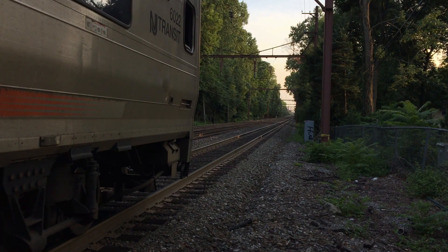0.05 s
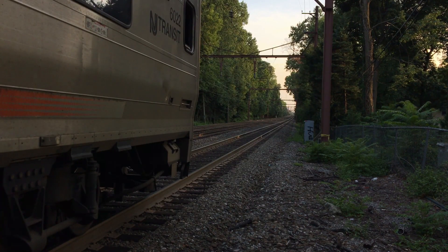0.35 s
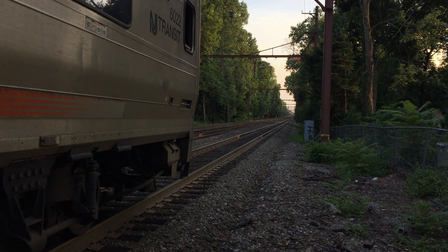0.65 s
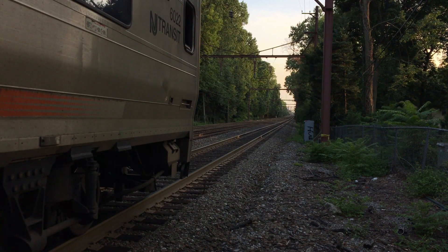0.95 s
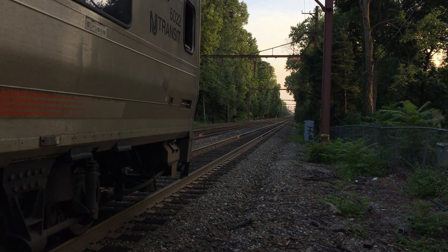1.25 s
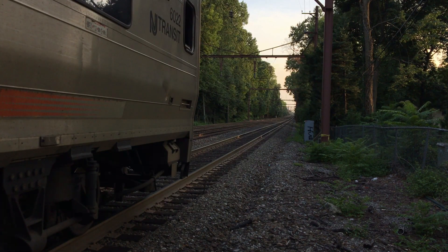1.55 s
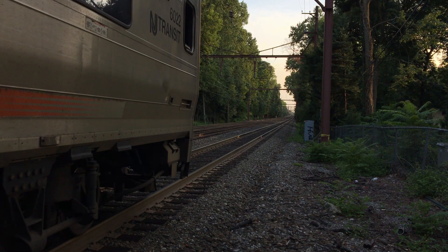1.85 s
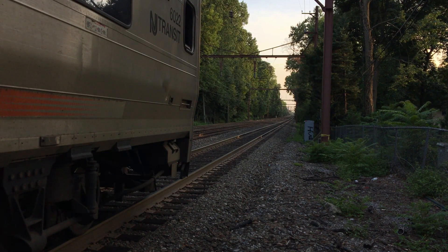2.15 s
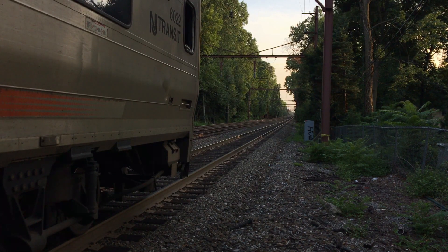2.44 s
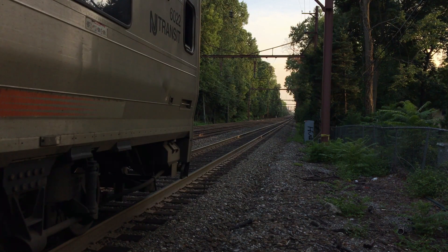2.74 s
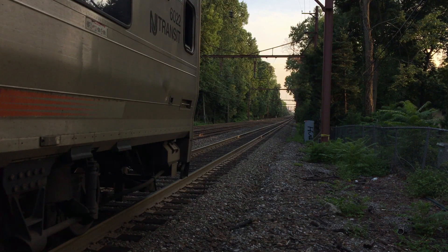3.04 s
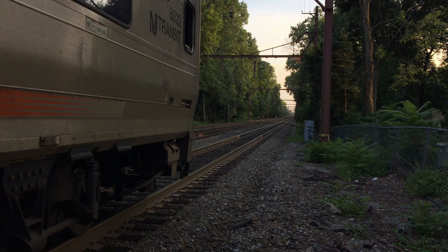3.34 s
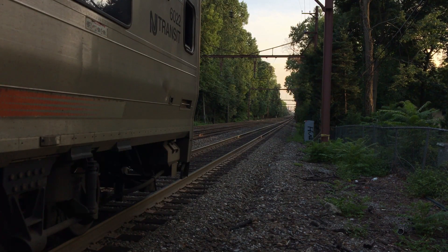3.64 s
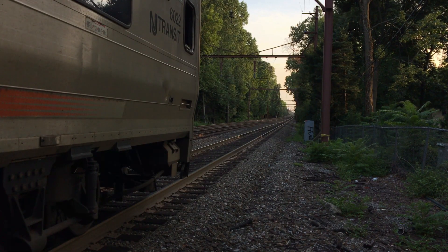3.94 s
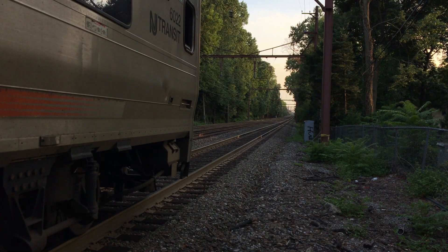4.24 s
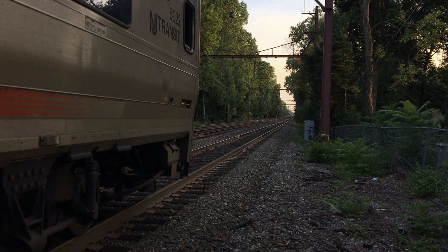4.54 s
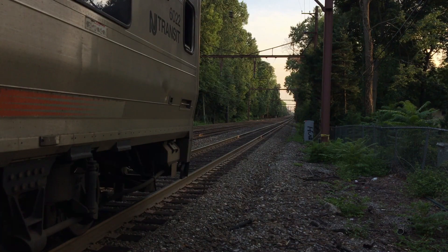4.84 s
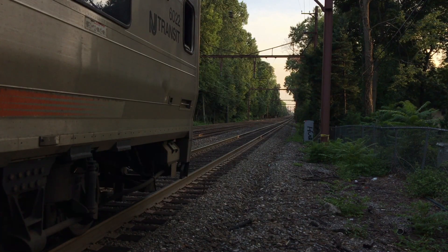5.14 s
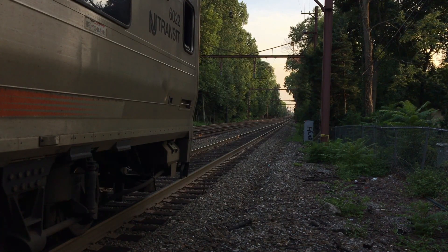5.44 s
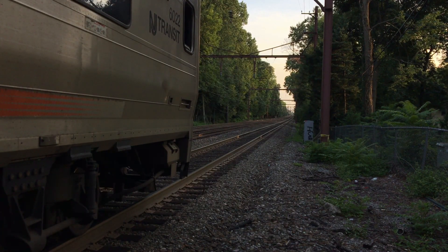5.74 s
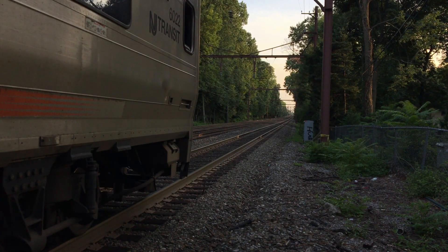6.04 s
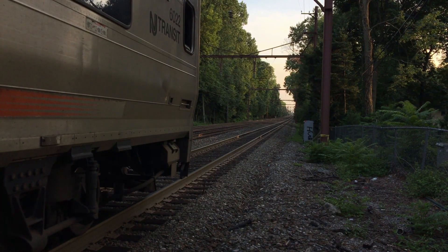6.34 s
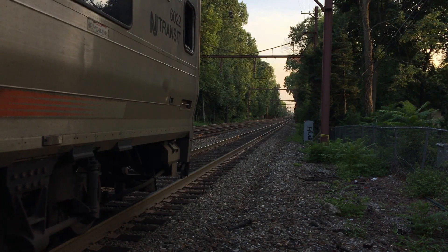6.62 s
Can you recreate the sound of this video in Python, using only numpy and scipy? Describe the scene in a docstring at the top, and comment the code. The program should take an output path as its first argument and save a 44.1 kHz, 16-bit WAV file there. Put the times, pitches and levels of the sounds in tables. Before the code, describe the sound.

Outdoors on a wooded railway line, the low fan noise and electrical hum of a waiting train sit under faint insects and a far bird. After about two seconds air hisses and an air-driven bell begins, close to the microphone. Six loud, slightly distorted strikes follow at a gently quickening pace, each with a harsh crack and a lingering ring, separated by metallic clacks and puffs of air.

```python
"""A wooded railway line in the evening: a standing train rumbles and hums, insects buzz, a far bird calls
four times and a far motor's note comes and goes. Compressed air hisses into the bell ringer, and its
piston drives the clapper against the bell six times, a little faster each time. The bell rings in
beating pairs of modes; between strikes the piston clacks back and the air valve snaps over.
The loud bell overloads the recorder and pulls its gain down."""
import sys
import numpy as np
from scipy import signal
from scipy.fft import rfft, irfft
from scipy.io import wavfile
from scipy.ndimage import uniform_filter1d, minimum_filter1d

SR = 44100
rng = np.random.default_rng(int(sys.argv[2]) if len(sys.argv) > 2 else 0)


def store_pcm(level_fs):
    """Save levels as 16-bit WAV."""
    pcm = np.round(np.clip(level_fs, -1, 1) * 32767).astype(np.int16)
    wavfile.write(sys.argv[1], SR, np.atleast_2d(pcm).T)


N = 303408
TIME = np.arange(N) / SR

# clapper strikes: t/s, force/dB, trim of the bell's hum/dB, share of the hum's twin/0-1
STRIKES = [(2.88, -0.5, -0.5, 0.32), (3.7403, .5, -1, 0.46), (4.5746, 0, -2, 0.29),
           (5.3300, -0.75, 2, 0.11), (6.0670, -1, 1, 0.1), (6.7987, -1, -0.5, 0.2)]
# colour of the air valve's snaps and puffs: f/Hz, relative level/dB
VALVE_COLOUR = [(900, -10), (1800, -11), (3100, -19), (3800, -6), (6000, -8.5), (7600, -6), (8600, -2.5),
                (9750, 0), (10300, -16), (11700, -5), (13500, -21), (15500, -15)]
# colour of the supply pipe's hiss: f/Hz, relative level/dB
PIPE_COLOUR = [(800, -4), (2300, 1), (3100, -1.5), (3500, 0.5), (3900, -2), (4500, -1.5), (5200, -8),
               (9000, -5.5), (12000, -14), (15600, -22)]


def from_db(db):
    """Decibels to gain."""
    return 10 ** (np.asarray(db) / 20)


def unit_rms(x):
    """Scale to an rms of 1."""
    return x / np.sqrt(np.mean(x ** 2) + 1e-20)


def noise(colour):
    """Unit-rms noise of a given colour, rolled off below its first point."""
    hz, db = np.transpose(colour)
    f = np.maximum(np.fft.rfftfreq(N, 1 / SR), 1)
    gain = from_db(np.interp(np.log(f), np.log(hz), db)) * np.minimum(f / hz[0], 1) ** 2
    return unit_rms(irfft(rfft(rng.standard_normal(N)) * gain, N))


def drift(rate_hz):
    """Smooth random modulation at unit rms."""
    f = np.fft.rfftfreq(N, 1 / SR)
    return unit_rms(irfft(rfft(rng.standard_normal(N)) / (1 + (f / rate_hz) ** 2), N))


def burst(start, rise, t60):
    """A percussive envelope that rises from its start and dies away."""
    age = np.maximum(TIME - start, 0)
    return (1 - np.exp(-age / rise)) * from_db(-60 * np.minimum(age / t60, 3))


def hump(crest_s, width_s):
    """A smooth rise and fall of height 1."""
    return np.exp(-((TIME - crest_s) / width_s) ** 2)


def hiss_level(opens_s, db, settle_db_per_s=3):
    """Envelope of a hiss that opens abruptly and eases as the pressure settles."""
    age = np.maximum(TIME - opens_s, 0)
    return (1 - np.exp(-age / .004)) * from_db(db - settle_db_per_s * age)


def trackside(x, wet_db, t60, dull_hz):
    """Add scattered, dull echoes from the cars and trees."""
    t = TIME[:SR]
    tail = rng.standard_normal(SR) * from_db(-60 * t / t60) * (t > .006)
    tail = signal.sosfilt(signal.butter(1, dull_hz, fs=SR, output="sos"), tail)
    return x + from_db(wet_db) * signal.fftconvolve(x, tail / np.linalg.norm(tail))[:N]


def insects(level_db=-60, shimmer_db=1):
    """Many far insects blend into one high, shimmering band."""
    # colour of the chorus: f/Hz, relative level/dB
    chorus = [(3000, -28.5), (6200, -17), (6600, -7), (6950, 3.5), (7250, -0.5), (7550, -7), (8300, -7),
              (8600, -21), (10300, -31), (14500, -34), (16000, -50)]
    return from_db(level_db + shimmer_db * drift(25)) * noise(chorus)


def far_bird(sag=0.0308, scoop=0.059, rasp=0.0089, trim_db=0.5, flutter_db=2.5, darken_db=9):
    """Harsh calls that start abruptly, scoop up, flutter, sag and darken, and echo in the wood."""
    # calls: t/s, length/s, pitch/Hz, level/dB
    calls = [(.25, 0.18, 942, -59.5), (0.571, 0.13, 923, -59), (1.056, 0.176, 921, -58),
             (1.507, 0.18, 912, -58.5)]
    # the bird's voice: harmonic number, level/dB
    harmonics = [(3, -8.5), (4, -5), (5, -16.5), (6, -18), (10, -23), (12, -28)]
    out = np.zeros(N)
    for start, length, pitch, db in calls:
        along = np.clip((TIME - start) / length, 0, 1)
        on = (along > 0) & (along < 1)
        hz = pitch * (1 - sag * along ** 2 - scoop * np.exp(-along * 20) + rasp * drift(150))
        phase = 2 * np.pi * np.cumsum(hz) / SR
        shift_db = darken_db * (along[on] - .5)  # weight moves from the upper harmonics to the lowest
        voice = sum(from_db(level + (shift_db if i == 0 else -shift_db)) * np.sin(round(k) * phase[on])
                    for i, (k, level) in enumerate(harmonics))
        voice *= from_db(flutter_db * drift(40)[on])
        out[on] += from_db(db + trim_db) * np.sin(np.pi * along[on]) ** .25 * voice
    return trackside(out, wet_db=-8, t60=0.88, dull_hz=5000)


def far_motor(start_s=2.68, pitch_hz=251, sag_hz_per_s=5, level_db=-41.5, octave_db=-13):
    """A faint, sinking note with its octave swells, holds and fades."""
    attack_s, hold_s, release_s = 0.093, 0.99, 0.56
    age = np.maximum(TIME - start_s, 0)
    fading = np.maximum(age - attack_s - hold_s, 0)
    envelope = np.minimum(age / attack_s, 1) * np.exp(-fading / release_s)
    phase = 2 * np.pi * np.cumsum(pitch_hz - sag_hz_per_s * age) / SR + 0.56 * drift(12)
    return from_db(level_db) * envelope * (np.sin(phase) + from_db(octave_db) * np.sin(2 * phase))


def standing_train(fans_db=-43, deep_db=-51, eases_s=4.22, fall_db_per_s=2.5, hum_follows=0.62):
    """Fans and electrical hum hold, then die down over a deep rumble; the low end swells once."""
    # colour of the fans: f/Hz, relative level/dB
    fan_colour = [(105, -6), (197, 0), (284, -11), (357, -9), (429, -14.5), (728, -21.5), (1180, -27.5),
                  (1450, -26.5), (3310, -40.5), (3620, -40.5), (3970, -43), (6000, -66), (7800, -82),
                  (13200, -120)]
    # colour of the deep rumble: f/Hz, relative level/dB
    deep_colour = [(15, -40), (25, -11), (43, -2.5), (62, 2.5), (85, -2), (130, -8), (250, -41),
                   (2000, -120)]
    # tones of the electrical gear: f/Hz, starting rms level/dB
    gear_tones = [(59.3, -52.5), (119.6, -56.5), (199.2, -56.5), (360.7, -61), (592.2, -65), (710.6, -68)]
    fall_db = fall_db_per_s * np.maximum(TIME - eases_s, 0)
    swell = hump(crest_s=6.79, width_s=0.11)  # under the last strike
    fans = (from_db(fans_db - fall_db) + from_db(-42) * swell) * noise(fan_colour)
    deep = (from_db(deep_db) + from_db(-45) * swell) * noise(deep_colour)
    hum = sum(from_db(db) * np.sqrt(2) * np.sin(2 * np.pi * hz * TIME + 0.86 * drift(2.9))
              for hz, db in gear_tones)
    return fans + deep + from_db(-hum_follows * fall_db) * hum


def stray_puff(start_s=1.842, level_db=-53):
    """A small puff of air escapes under the train."""
    return from_db(level_db) * burst(start_s, rise=0.009, t60=0.23) * noise(PIPE_COLOUR)


def air_supply(surge_db=11.5, flutter_db=1.5):
    """Air hisses and surges through the empty pipe; a moment after it opens, the ringer starts to leak."""
    # colour of the ringer's leak: f/Hz, relative level/dB
    leak_colour = [(600, -23), (1200, 0.5), (2100, 8), (3100, -8.5), (5000, -3), (5700, 8), (6700, -4),
                   (8700, 7), (9500, 5), (10400, 2.5), (12100, 9), (13400, 4), (15600, 5)]
    surge = from_db(surge_db * hump(crest_s=2.615, width_s=0.12))
    pipe = hiss_level(opens_s=2.25, db=-51) * surge * noise(PIPE_COLOUR)
    flutter = from_db(flutter_db * drift(30))
    leak = hiss_level(opens_s=2.435, db=-41) * flutter * noise(leak_colour)
    return pipe + leak


def piston_rise(puff_db=-36.5, puff_lead_s=0.066, rush_db=-41, rush_lead_s=0.034):
    """Air drives the piston up: a low rush into every strike, and a puff for each after the first."""
    # body of the rush: f/Hz, relative level/dB
    rush_colour = [(150, -42), (300, -9), (410, 1), (560, -4), (780, -19), (1250, -4), (1600, -21),
                   (2000, -6.5), (3000, -17), (8000, -22.5)]
    puffs = sum(burst(s - puff_lead_s, rise=0.01, t60=0.29) for s, *_ in STRIKES[1:])
    rushes = sum(hump(s - rush_lead_s, width_s=0.1) for s, *_ in STRIKES)
    return from_db(puff_db) * puffs * noise(VALVE_COLOUR) + from_db(rush_db) * rushes * noise(rush_colour)


def air_valve(seat_s=0.0034, touch_db=-7, t60=0.039, tail_db=-12):
    """The valve snaps over: a light touch, then it seats and buzzes briefly."""
    # valve snaps: t/s, level/dB
    snaps = [(2.792, -33), (3.5247, -26), (4.414, -25.5), (5.1746, -26.5), (5.9194, -25.5), (6.657, -27)]
    envelope = np.zeros(N)
    for start, db in snaps:
        touch = from_db(touch_db) * burst(start, 0.00044, t60)
        seat = burst(start + seat_s, 0.00089, t60)
        tail = from_db(tail_db) * burst(start, rise=.004, t60=0.22)
        envelope += from_db(db) * (touch + seat + tail)
    return envelope * noise(VALVE_COLOUR)


def piston_stop(bounce_s=0.0047, bounce_db=-4, housing_db=-1, rattle_db=1):
    """The piston falls back on its stop, bounces, rattles and rings its housing."""
    # landings: t/s, force/dB, t60/s, tilt of the housing's ring/dB per octave
    clacks = [(2.438, -40, 0.057, -6), (2.4755, -35.5, 0.054, -1.5), (3.393, -16, 0.065, 2),
              (4.2915, -18.5, 0.085, 1), (5.0724, -19.5, 0.094, 1), (5.818, -21, 0.087, 1.5),
              (6.5607, -23, 0.096, 1.5)]
    # colour of the clack: f/Hz, relative level/dB
    clack_colour = [(900, -30.5), (1800, -10.5), (3200, -13), (5200, -5.5), (6800, -13), (8000, -10.5),
                    (9400, 1.5), (10300, -13.5), (11300, -6), (12300, 2), (13800, -15), (15200, -12),
                    (15900, -30)]
    # housing modes: f/Hz, level/dB, t60/s
    housing_modes = [(1966, -5, 0.11), (2445, -15.5, 0.1), (4860, -6, 0.1), (5700, -9.5, 0.1),
                     (8340, -9, .08), (9470, -10, 0.25), (9900, -15, 0.086), (11850, -28, .07)]
    contacts = np.zeros(N)
    for start, db, t60, _ in clacks:
        bounce = from_db(bounce_db) * burst(start + bounce_s, 0.00018, t60 / 2)
        contacts += from_db(db) * (burst(start, 0.00026, t60) + bounce)
    out = contacts * from_db(-rattle_db * drift(300)) * noise(clack_colour)
    times, force_db, _, brightness = np.transpose(clacks)
    for hz, db, t60 in housing_modes:
        tilt_db = brightness * np.log2(hz / housing_modes[-1][0])
        scatter_db = rng.normal(0, 1.14, len(times))
        hits = np.full(N, 1e-18)
        hits[np.round(times * SR).astype(int)] = from_db(force_db + db + housing_db + tilt_db + scatter_db)
        radius, angle = from_db(-60 / (t60 * SR)), 2 * np.pi * hz / SR
        out += signal.lfilter([0, np.sin(angle)], [1, -2 * radius * np.cos(angle), radius ** 2], hits)
    return out


def strike_crack(crack_db=-18, crunch_db=-22.5, crunch_delay_s=0.03):
    """A harsh, noisy crack opens each strike, followed 30 ms later by a duller crunch."""
    # colour of the crack: f/Hz, relative level/dB
    crack_colour = [(200, -10), (700, -14.5), (1300, -1), (2400, 6.5), (3200, -9), (4400, 8), (7000, -8.5),
                    (8300, 0), (10000, -8), (12000, -3), (15500, -22)]
    # colour of the crunch: f/Hz, relative level/dB
    crunch_colour = [(600, -20), (840, 1), (980, -2), (1250, 7), (1600, -18), (2000, 12), (3200, -23),
                     (8000, -36)]
    cracks = sum(from_db(db) * burst(s, rise=0.0002, t60=0.092) for s, db, *_ in STRIKES)
    crunches = sum(from_db(db) * burst(s + crunch_delay_s, rise=0.0011, t60=0.04)
                   for s, db, *_ in STRIKES)
    crack = from_db(crack_db) * cracks * noise(crack_colour)
    crunch = from_db(crunch_db) * crunches * noise(crunch_colour)
    return crack + crunch


def bell_mode(age, hz, db, t60, swell_s, beat_hz=0, twin=0, crest_s=0, lag_cycles=0):
    """A mode swells and dies away; its twin, if any, beats against it and falls into step at the crest."""
    tone = np.sin(2 * np.pi * (hz * age - lag_cycles))
    twin_tone = twin * np.sin(2 * np.pi * (hz * age + beat_hz * (age - crest_s)))
    envelope = from_db(db - 60 * age / t60) * (1 - np.exp(-age / swell_s))
    return (tone + twin_tone) * envelope


def bell(hum_hz=1112.4, hum_db=-18, hum_swell_s=0.0057, handover_s=0.004):
    """A long, slowly beating hum rings under brief overtones; each blow takes over from the old ring."""
    # upper modes, each a close pair: f/Hz, beat/Hz, twin share/0-1, time to the beat's crest/s
    overtones = [(2139.5, 1.5, .3, .06), (2418, 3.5, .15, 0), (3849, 1.9, .75, 0), (4039.5, 4, .4, 0),
                 (4856, 9, .3, .06), (5979, 4.4, .6, .06), (6303, 5, .2, .06), (6433, 3, .2, .06),
                 (8063, 5, .2, .06), (8158, 1.9, .35, .06), (9340, 6, .3, .06), (10478, 4, .2, .06),
                 (10760, 6, .3, .06), (11400, 6, .3, .06), (12937, 10, .5, .03), (15465, 4, .2, .06)]
    # how each upper mode rings: level/dB, t60/s, swell/s
    envelopes = [(-9, 0.64, 0.0095), (-10, 0.93, 0.0008), (-24, 0.85, 0.0011), (-17, 0.95, 0.00076),
                 (-28, 0.17, .001), (-14, 0.63, 0.044), (-33.5, 0.45, .002), (-35, 0.63, .002),
                 (-31.5, 0.52, .002), (-19, 0.63, 0.002), (-44.5, 0.44, .002), (-31.5, 0.44, .002),
                 (-41, .25, .002), (-39, .33, .002), (-27.5, 0.32, .01), (-35, 0.3, .002)]
    flare_beat_hz, flare_crest_s = 3.45, 0.035
    out = np.zeros(N)
    ends = [s for s, *_ in STRIKES[1:]] + [N / SR]
    for (start, force_db, trim_db, hum_twin), end in zip(STRIKES, ends):
        span = slice(round(start * SR), min(round((end + .05) * SR), N))
        age = TIME[span] - TIME[span][0]
        ring = bell_mode(age, hum_hz, hum_db + trim_db, t60=5.3, swell_s=hum_swell_s,
                         beat_hz=.95, twin=hum_twin, crest_s=.32)
        # a short-lived neighbour makes the hum flare, dip and swell
        ring += bell_mode(age, hum_hz + flare_beat_hz, db=-28, t60=0.96, swell_s=hum_swell_s,
                          lag_cycles=flare_beat_hz * flare_crest_s)
        for (hz, beat_hz, twin, crest_s), (db, t60, swell_s) in zip(overtones, envelopes):
            beat_hz *= rng.normal(1, .12)
            ring += bell_mode(age, hz, db + rng.normal(0, .5), t60, swell_s, beat_hz, twin, crest_s)
        handover = np.exp(-np.maximum(TIME[span] - end, 0) / handover_s)
        out[span] += from_db(force_db) * ring * handover
    return out


def gain_control(x, threshold_db=-24, squeeze=0.41, attack_s=0.082, hold_s=.1, release_db_per_s=75):
    """A loud sound pulls the gain down; it is held briefly and then recovers."""
    level_db = 10 * np.log10(np.abs(uniform_filter1d(x ** 2, size=882)) + 1e-12)
    over_db = np.maximum(level_db - threshold_db, 0)
    hold = round(hold_s * SR)
    held_db = -minimum_filter1d(-over_db, hold, origin=(hold - 1) // 2)
    fall_db = release_db_per_s * TIME
    released_db = np.maximum.accumulate(held_db + fall_db) - fall_db
    pole = np.exp(-1 / (attack_s * SR))
    return x * from_db(-squeeze * signal.lfilter([1 - pole], [1, -pole], released_db))


def scene():
    """Bell and ringer close by, the train and the wood behind, in mono."""
    hits = trackside(strike_crack() + piston_stop() + air_valve(), wet_db=-12, t60=0.17, dull_hz=8040)
    ringing = trackside(bell(), wet_db=-31.5, t60=0.33, dull_hz=5000)
    air = air_supply() + piston_rise()
    background = standing_train() + stray_puff() + far_motor() + insects() + far_bird()
    return (background + air + hits + ringing)[None]


def record(dry, limit_rms=0.24, ceiling=0.47, cutoff_hz=15700):
    """Gain control, then a fast limiter and overload on the first moments of a strike; the top is cut."""
    levelled = gain_control(dry[0])
    power = uniform_filter1d(levelled ** 2, size=160)
    limited = levelled / (1 + (power / limit_rms ** 2) ** 2) ** (1 / 4)
    clipped = limited / (1 + (limited / ceiling) ** 8) ** (1 / 8)
    high_cut = signal.ellip(10, .2, 100, cutoff_hz, fs=SR, output="sos")
    return signal.sosfilt(high_cut, clipped)[None]


dry = scene()
out = record(dry)
store_pcm(out)
```